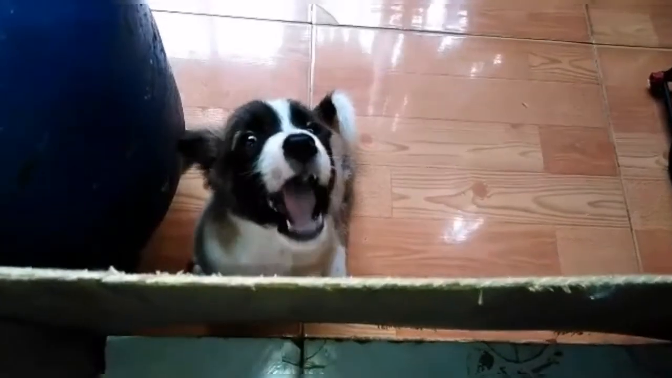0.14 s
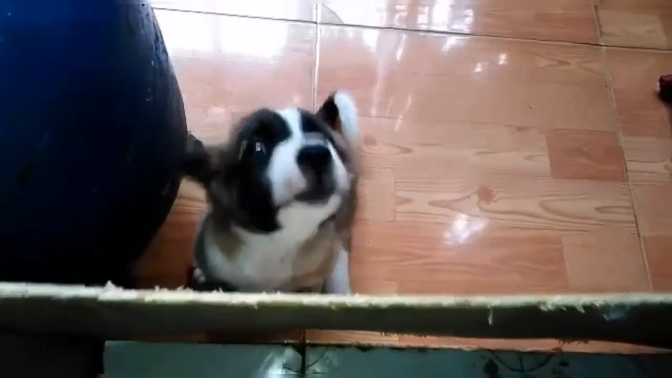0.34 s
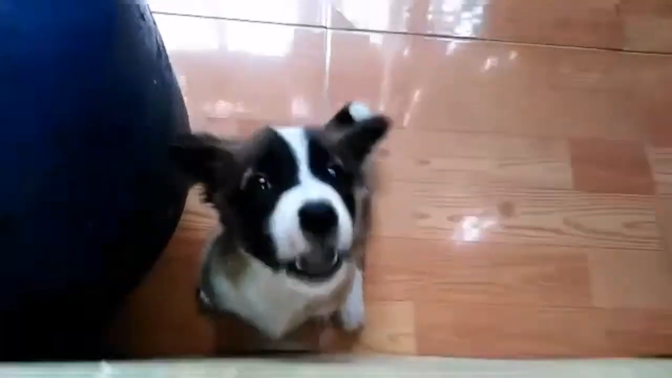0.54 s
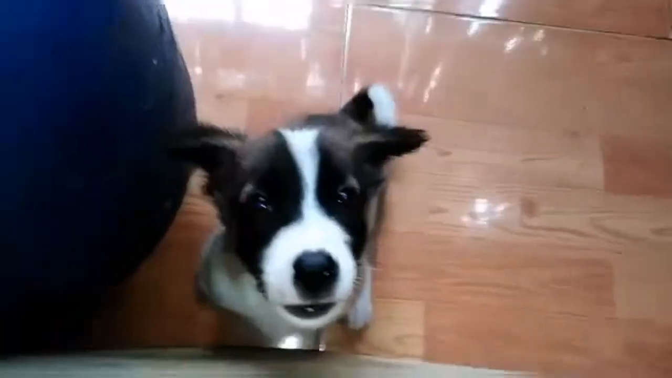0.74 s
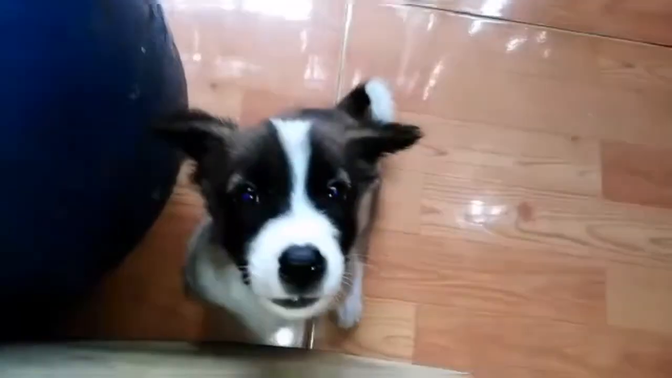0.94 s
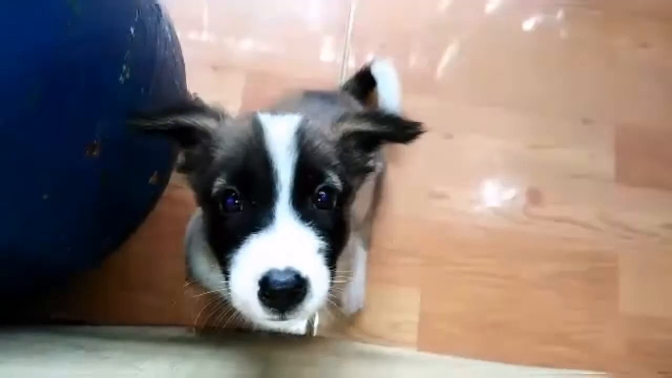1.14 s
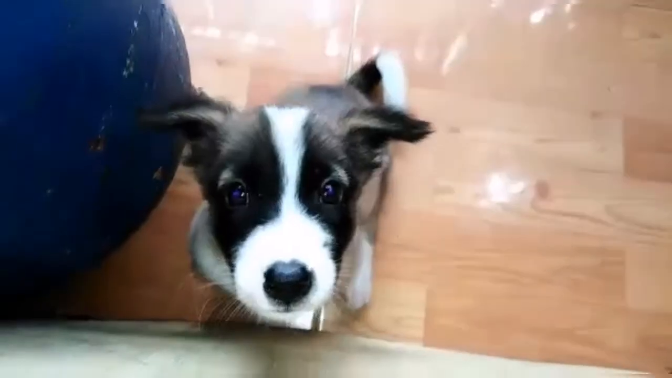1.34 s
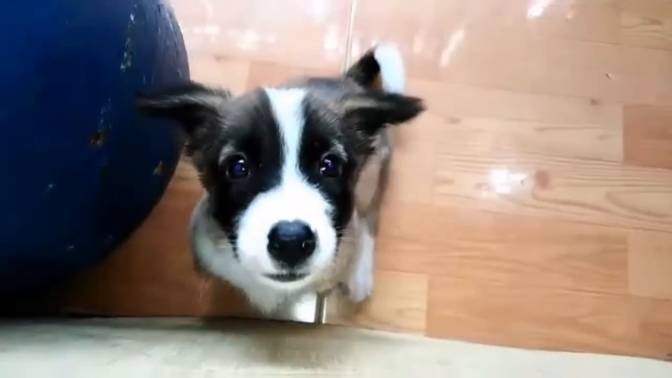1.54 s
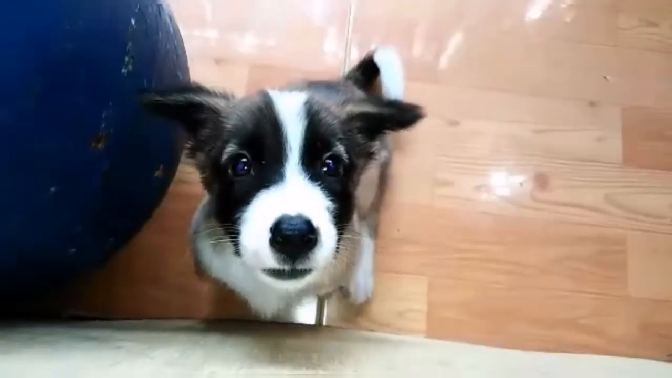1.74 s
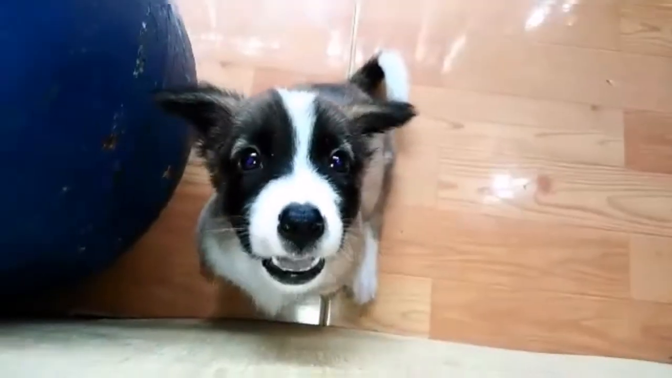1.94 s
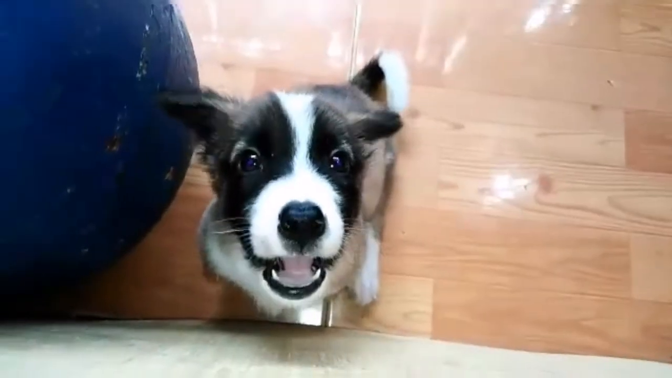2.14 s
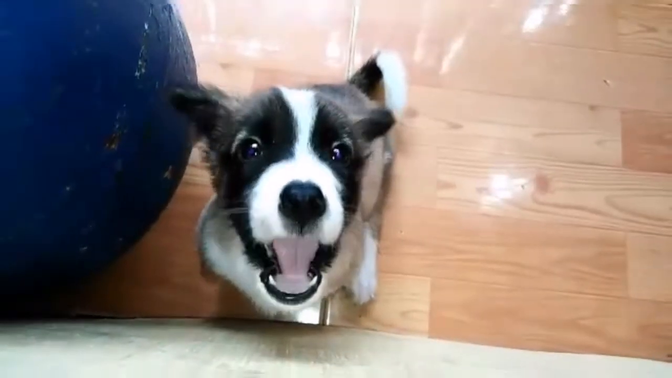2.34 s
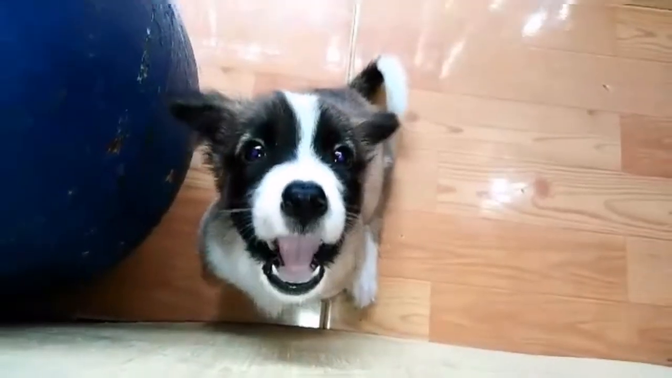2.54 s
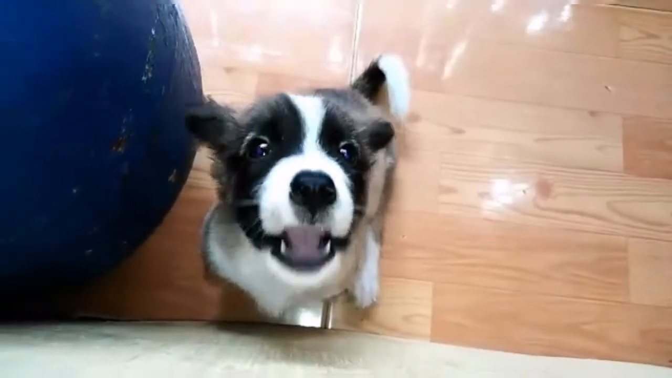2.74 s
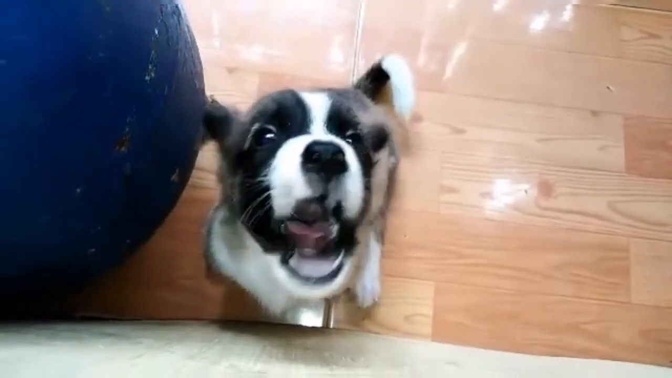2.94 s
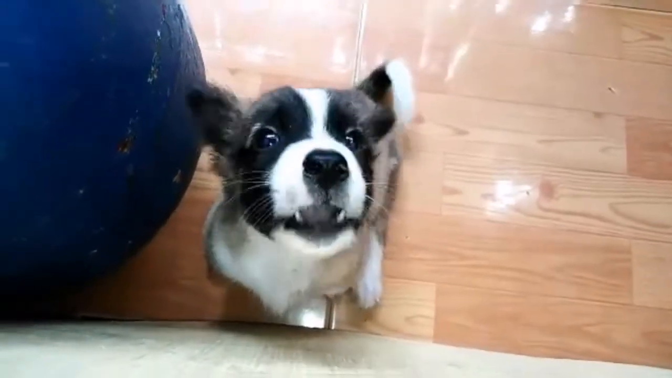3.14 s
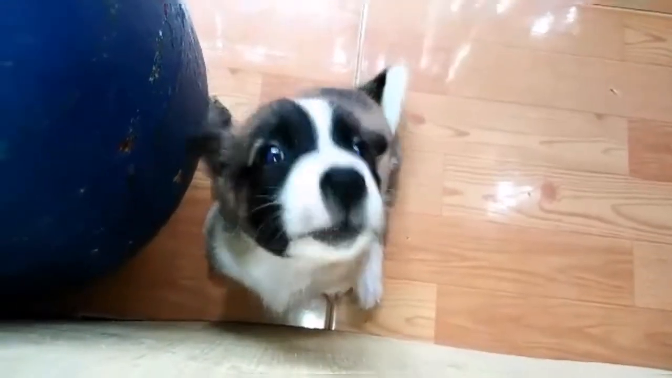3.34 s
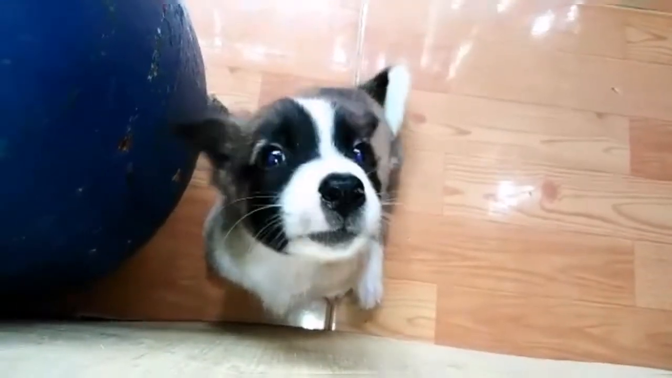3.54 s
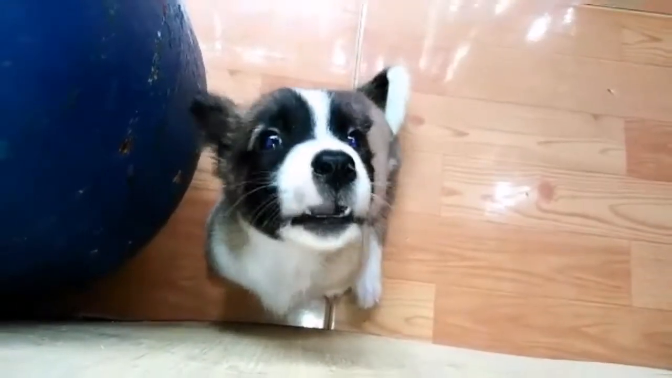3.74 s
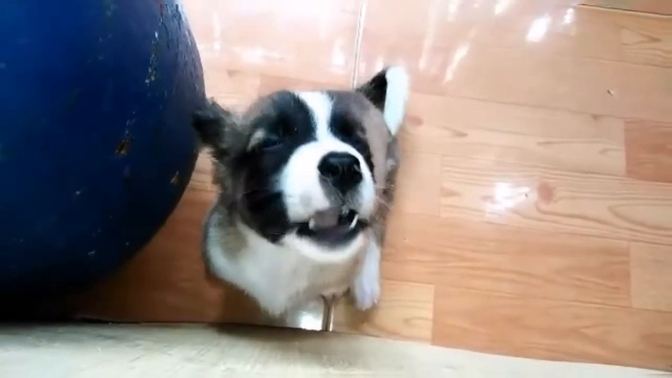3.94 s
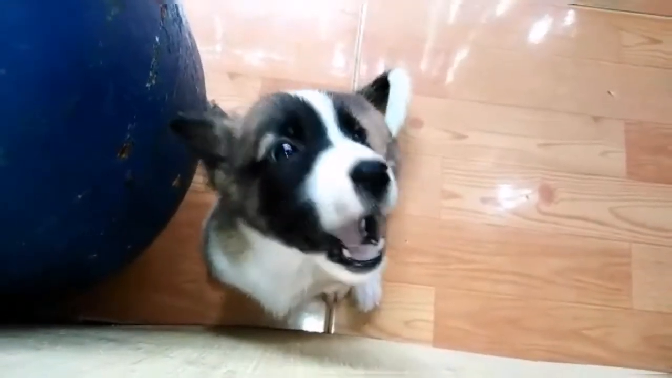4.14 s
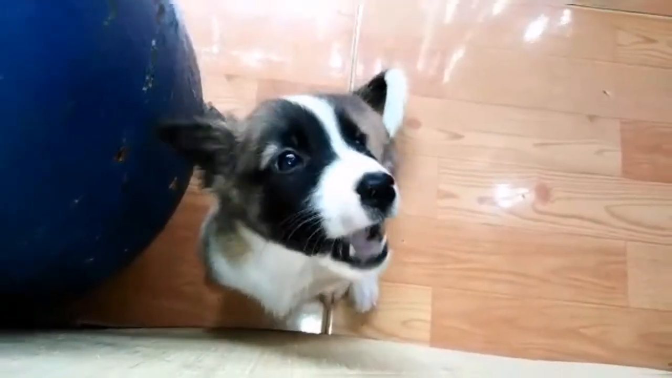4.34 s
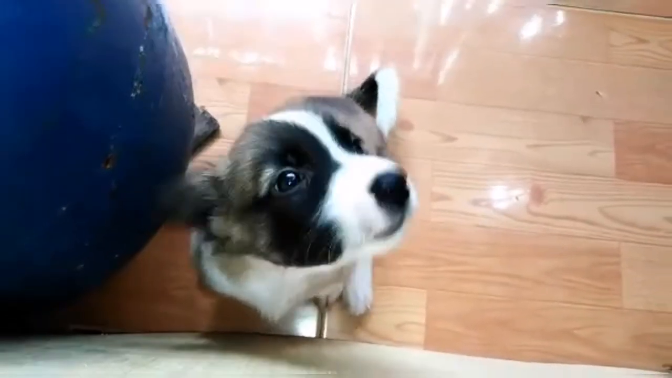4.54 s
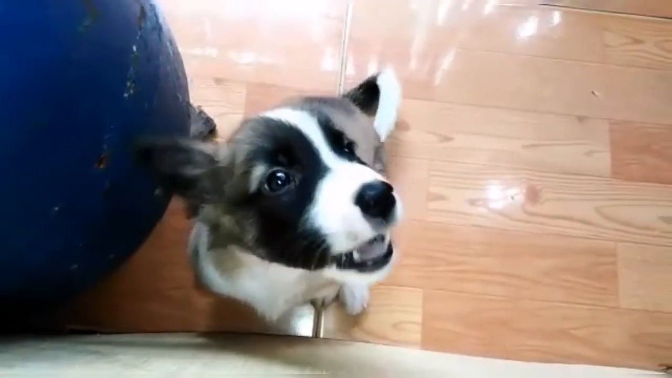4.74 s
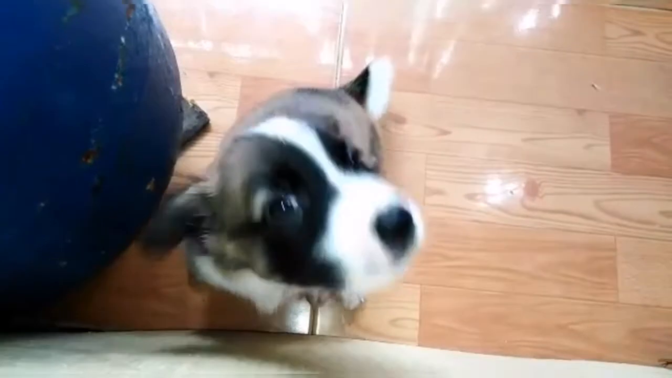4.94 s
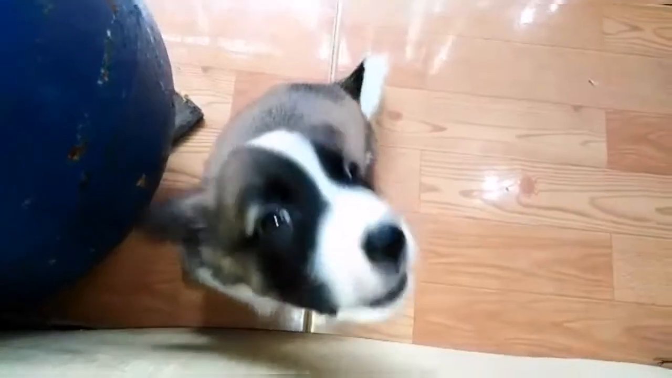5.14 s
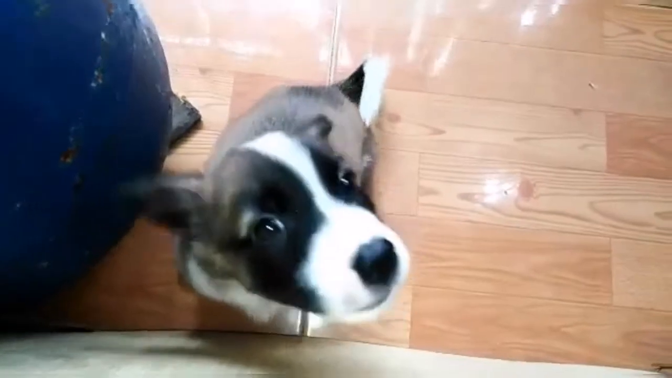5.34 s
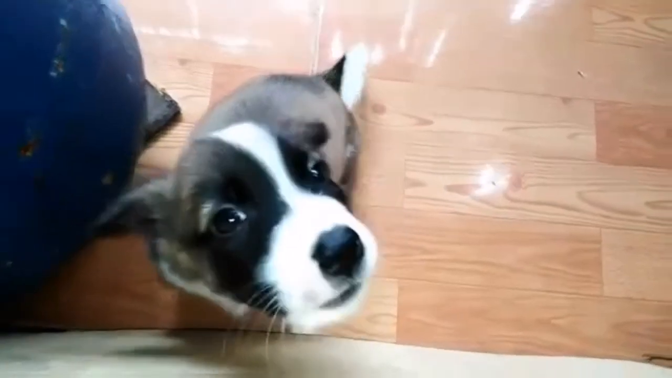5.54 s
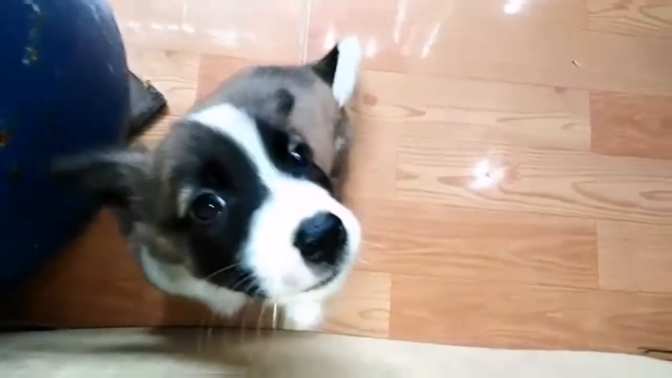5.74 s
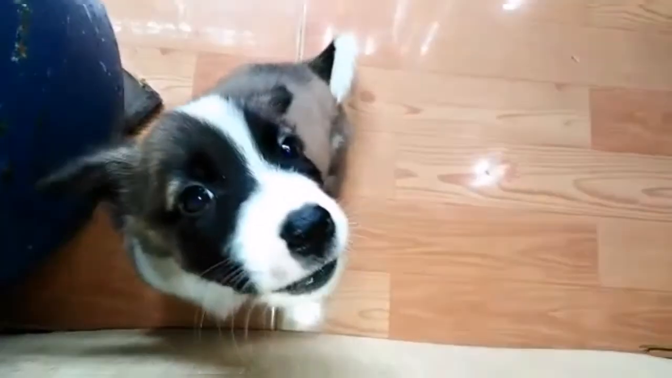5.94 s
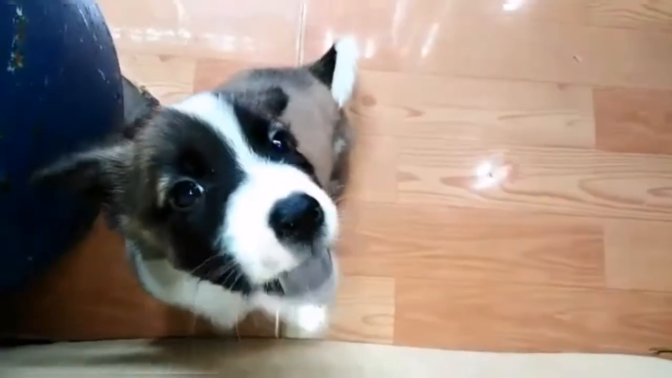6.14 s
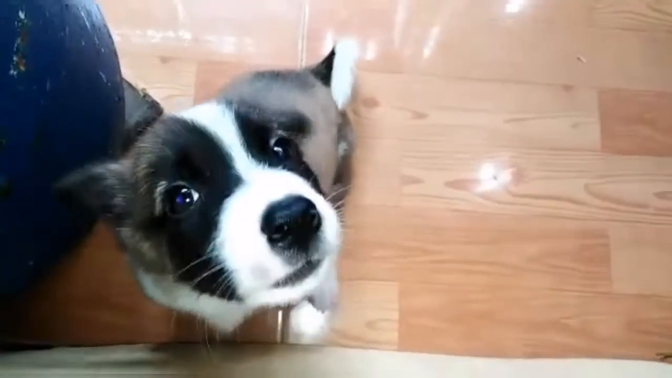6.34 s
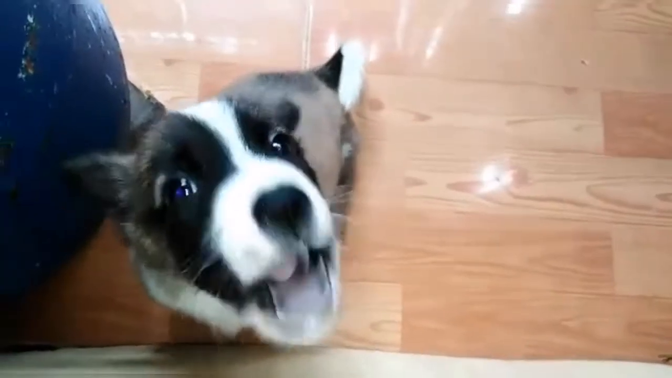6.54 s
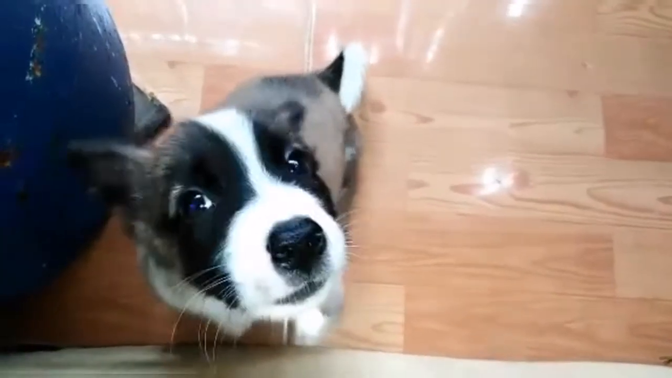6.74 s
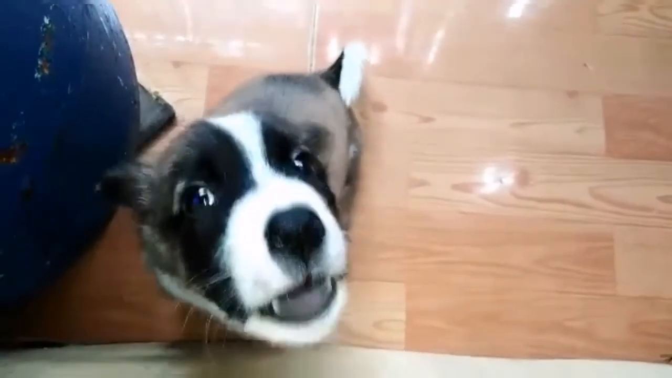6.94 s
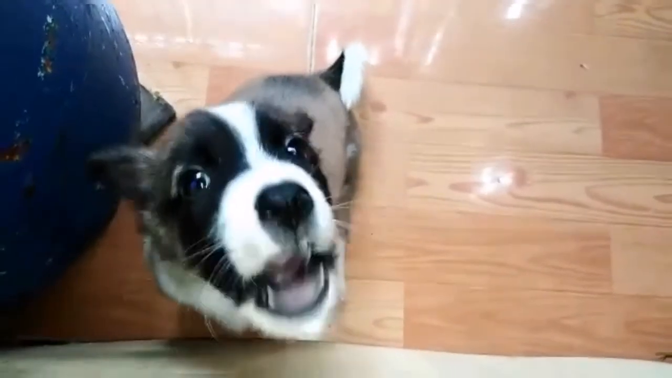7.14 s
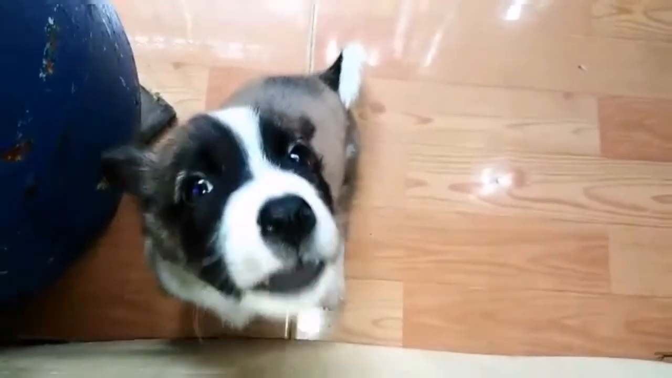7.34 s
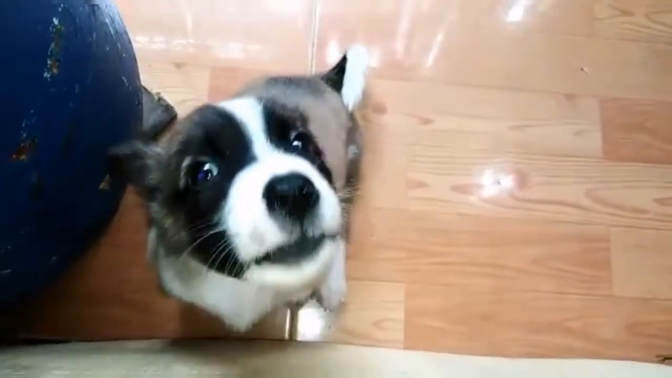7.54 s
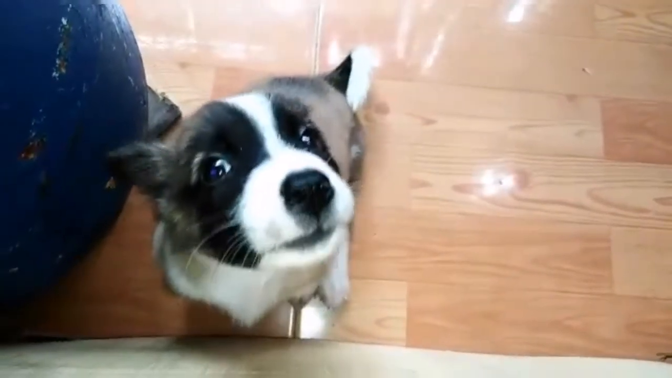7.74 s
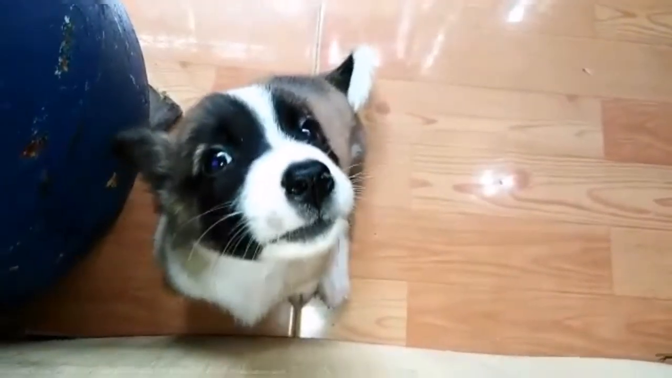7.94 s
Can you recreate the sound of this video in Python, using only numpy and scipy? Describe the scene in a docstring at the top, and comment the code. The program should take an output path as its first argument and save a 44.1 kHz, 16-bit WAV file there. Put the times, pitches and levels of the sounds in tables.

```python
"""A puppy yaps over a faint hum, sitting on a hard floor in a small bare room, a phone held just above it.
Its vocal folds chop the breath into a tone that the throat and mouth shape. Each yap arches in pitch:
hoarse at first, often split by in-between tones at the top, rough again as the mouth closes.
A few thin squeaks join in. In the lull the phone is shifted and something like a board scrapes.
The loudest yaps overload the microphone, and a limiter holds them level."""
import sys
import numpy as np
from scipy import signal
from scipy.fft import rfft, irfft, next_fast_len
from scipy.io import wavfile
from scipy.ndimage import uniform_filter1d, minimum_filter1d

SR = 44100
rng = np.random.default_rng(int(sys.argv[2]) if len(sys.argv) > 2 else 0)


def log_audio(samples):
    """Write samples as a 16-bit WAV file to the path given in sys.argv[1]."""
    # one column per channel
    frames = np.atleast_2d(samples).T
    # limit to full scale, then quantise
    limited = np.clip(frames, -1, 1)
    pcm = np.round(limited * 32767).astype(np.int16)
    wavfile.write(sys.argv[1], SR, pcm)


N = 352789
TIME = np.arange(N) / SR

# A yap is a hard push of air, then a lighter tail in which the pitch falls and the mouth closes.
# (t/s, length/s, attack/s, push/s, fall/s, top pitch/Hz, end pitch/Hz, scoop up/0-1, sag in push/0-1,
#  push level/dB, tail level/dB, end level/dB, in-between tones/gain, push roughness/0-1,
#  tail roughness/0-1, push brightness/dB, tail brightness/dB, mouth resonance/Hz, upper resonance/Hz)
YAP_SHAPES = [ (-.1, .11, .003, .05, 0.1,  770, 572, .3, 0,  -5, -21, -23.5,  0, .4, 0.44,  5, 17,  1730, 3140),
              (0.104, 0.19, 0.00406, .075, 0.099,  965, 623.4, 0.36, 0.08,  -2, -10, -14.5,  0.14, 0.33, 0.13,  5.5, 5,  1660, 3080),
              (0.531, 0.08, 0.0037, 0.047, 0.052,  763.4, 753, 0, 0,  -12, -2, -18.5,  0.5, 0.17, 0.42,  4, 9.5,  1460, 4440),
              (1.733, 0.081, 0.014, 0.053, 0.03,  678.3, 663, .14, 0,  -14.5, -14, -19.5,  0, 0.15, .08,  1, 14,  1750, 4000),
              (1.988, 0.12, 0.0022, 0.042, 0.038,  787.5, 740, 0.29, 0,  -9.5, -12, -24.5,  0, 0.2, 0.01,  3.5, 20,  2040, 3550),
              (2.255, 0.14, 0.0028, 0.061, 0.09,  894, 595, 0.34, 0,  -3.5, 4, -27.5,  0, 0.03, 0,  9, 26,  1900, 3730),
              (2.531, .182, 0.0033, 0.1, 0.05,  1036, 777, 0.5, .3,  0, -28, -14,  0.5, 0.15, 0.21,  10.5, 5.5,  1800, 3530),
              (2.858, .2, 0.0027, 0.1, 0.1,  949, 593, 0.18, 0.02,  -2, -15, -17,  1.35, 0.14, 0.1,  11.5, 4,  1550, 3330),
              (3.229, 0.17, .012, 0.11, 0.081,  945, 594, 0.41, 0.05,  -3.5, -11, -13.5,  0.6, 0.09, 0.42,  4, 3,  1394, 3280),
              (3.609, 0.042, 0.017, 0.028, 0.023,  678.5, 563, 0.16, 0,  -17, -23, -23.5,  0.5, 0.49, 0.59,  -3.5, 1.5,  1510, 4100),
              (3.838, .132, 0.0028, 0.084, .11,  866, 559, 0.36, 0.03,  -8.5, -5, -17,  0, 0.08, 0.34,  6.5, 9,  1600, 3670),
              (4.128, 0.14, 0.0024, 0.06, .11,  872, 562, 0.41, 0,  -7, -2, -17.5,  1.5, 0.05, 0.29,  1.5, 14,  1610, 3460),
              (4.405, 0.19, 0.0034, .062, 0.068,  963, 588, 0.37, .17,  -2, -12, -18.5,  0.16, 0.54, 0.13,  8, 6,  1480, 3270),
              (4.744, 0.18, 0.0034, 0.079, 0.074,  965.4, 587, 0.13, 0.04,  -0.5, -10, -19.5,  1.5, 0.08, 0.21,  3, -2,  1490, 3160),
              (5.076, .18, 0.0067, 0.086, .078,  977, 550, 0.44, 0,  -5, -11, -21.5,  0.9, .14, 0.19,  -1, -3.5,  1314, 3110),
              (5.451, .167, .018, 0.063, 0.067,  961.7, 521, .3, 0.03,  -3.5, -9.5, -18.5,  1.8, 0.29, .28,  2, -4.5,  1290, 3170),
              (5.842, 0.071, 0.016, 0.045, .052,  730, 536, .12, 0,  -18, -20, -25.5,  1.3, 0.1, 0.37,  -19, -8.5,  1450, 3550),
              (6.127, 0.17, .006, 0.058, 0.095,  964, 548, 0.34, 0.01,  -3.5, -4.5, -19,  1.5, 0.31, 0.23,  0, 6,  1353, 3400),
              (6.482, .171, .007, 0.075, 0.073,  969.3, 523.6, 0.4, 0,  -1, -7, -21,  1.8, 0.22, 0.21,  3, -1,  1290, 3380),
              (6.852, .16, .016, 0.0815, 0.082,  940, 546, 0.4, 0.03,  -1, -3, -15,  2.5, 0.17, 0.2,  -0.5, 3.5,  1320, 3410),
              (7.206, 0.17, .02, 0.073, .11,  915, 553, 0.47, 0.05,  -3.5, -1.5, -19,  2, 0.17, 0.29,  1, 3.5,  1340, 3440),
              (7.593, 0.095, .003, .035, 0.068,  770, 542.4, 0.04, 0.04,  -10.5, -11, -13.5,  1.2, 0.19, 0.33,  8.5, 3.5,  1390, 4100),
              (7.908, .091, .003, 0.023, 0.027,  795, 678, 0.18, 0.05,  -10, -12.5, -14,  0.9, 0.42, 0.2,  4.5, 10,  1450, 3400),
              ]
# the fundamental (the tone at the pitch itself) in a clean tail: (pitch/Hz, level over mouth band/dB)
CLEAN_FUNDAMENTAL = [(560, 3), (650, 6), (780, -9), (880, -11.5), (960, 3.5)]
# the throat's resonances, the frequencies it favours: (f/Hz, width/Hz, level/dB)
THROAT_RESONANCES = [(620, 43, -58), (1573, 120, -9.5), (3077, 920, -7), (4360, 545, -8), (5390, 384, -7.5)]
# how long the room's echo takes to fade by 60 dB: (f/Hz, fade/s)
ECHO_FADE = [(200, 0.29), (1400, 0.53), (3200, 0.52), (6000, 0.43), (14000, 0.28)]
# hard things nearby that ring along: (f/Hz, level/dB)
NEARBY_RINGS = [(695, 5.5), (1890, 1), (2270, 9.5), (2900, 4), (3150, 8), (4330, 6), (4576, -2),
                (5975, 11.5), (7070, 6.5)]
# the tones of the hum: (f/Hz, level/dB)
HUM_TONES = [(61, -44.5), (125, -49.5)]
# tone colour of the room's rumble and hiss: (f/Hz, relative level/dB)
ROOM_NOISE_COLOUR = [(30, -24), (55, 3.5), (130, 7.5), (200, -6), (350, -12), (1500, -16.5), (4000, -16.5),
                     (14000, -28.5)]
# rising squeaks; one is a lone whimper, the others break into a yap: (t/s, length/s, start pitch/Hz,
#  end pitch/Hz, start level/dB, end level/dB, fundamental/dB, brightness/dB, mouth resonance/Hz)
SQUEAK_SHAPES = [(.509, 0.016, 892, 1050, -21, -9, -10, -4, 1850),
                 (1.449, 0.059, 1007, 1350, -33, -24.5, 17.5, -6, 1900),
                 (7.574, .019, 917, 1040, -18, -10.5, -5, -14, 1900),
                 (7.894, 0.0097, 837, 1010, -20, -13.5, -9.5, -25, 1800)]
# the phone shifts in the hand, and at 3.585 s the puppy's paw bumps: (t/s, attack/s, hold/s, release/s,
# level/dB)
RUB_STROKES = [(.58, .015, 0.003, 0.023, -26), (.738, .012, 0.027, 0.073, -24),
               (1.2, 0.011, 0.073, 0.12, -33), (1.44, 0.03, 0.067, 0.03, -30.5),
               (3.585, .015, 0.042, .03, -30)]
# tone colour of that rubbing: (f/Hz, relative level/dB)
RUB_COLOUR = [(40, 2), (70, 4.5), (140, 6), (260, -0.5), (340, -14), (445, -3.5), (560, -14), (1200, -25)]
# the board scrapes, slides on and is brushed again: (t/s, attack/s, hold/s, release/s, level/dB)
BOARD_STROKES = [(.655, 0.038, 0.074, 0.027, -15.5), (.8, 0.014, .03, 0.15, -39.5),
                 (1.19, .02, 0.078, 0.13, -43.5)]
# tone colour of that scraping: (f/Hz, relative level/dB)
BOARD_COLOUR = [(180, -44), (300, -16), (407, -5), (1550, -10.5), (2240, -3), (2590, -4.5), (3090, 0),
                (3750, -7), (4400, -2.5), (4840, -12.5), (7130, -4.5), (14000, -22)]

SCOOP_S, RELAX_S = .016, .0087   # how fast the pitch climbs, and the push gives way to the tail
ONSET_DB, ONSET_DULL_DB = -13.5, -9.5   # starting level; dullness of the half-shut mouth
SWELL_SHARE, SETTLE_SHARE = .21, .312   # parts of the push in which pressure builds and hoarseness fades
ONSET_ROUGH, CLOSING_ROUGH = .824, .17   # roughness at the start, and added as the mouth closes
CRACK = .59   # share by which the tail gets rougher halfway down the fall
EASING = .57   # share of their squeeze that the folds give up by the end of the push
FALL_BEND = .85   # the fall follows this share of half a cosine
ONSET_FUNDAMENTAL_DB, PUSH_FUNDAMENTAL_DB = -10, -34   # pressed folds give a weak fundamental
ROUGH_THINS_DB = -39   # loss of fundamental in a fully rough tail


def from_db(db):
    """Turns decibels into a gain to multiply by."""
    return 10 ** (np.asarray(db) / 20)


def rms_one(x):
    """Scales a sound to an average strength (rms) of 1."""
    return x / np.sqrt(np.mean(x ** 2) + 1e-20)


def blend(start, end, share):
    """Moves from start to end as share goes from 0 to 1."""
    return start + (end - start) * share


def at_hz(points, hz):
    """Reads between the rows of a table, giving each octave equal room."""
    table = np.array(points)
    return np.interp(np.log(np.maximum(hz, 1)), np.log(table[:, 0]), table[:, 1])


def noise(shape, size):
    """Noise of strength 1 whose tone colour follows shape(Hz)."""
    padded = next_fast_len(size)
    hz = np.arange(padded // 2 + 1) * SR / padded
    spectrum = rfft(rng.standard_normal(padded)) * shape(hz)
    return rms_one(irfft(spectrum, padded)[:size])


def wander(rate_hz, size):
    """Smooth random motion, typically about 1 either way."""
    return noise(lambda hz: 1 / (1 + (hz / rate_hz) ** 4), size)


def resonances(modes, hz):
    """Gain of several resonances side by side, each a peak around its centre."""
    return np.sqrt(sum(from_db(db) ** 2 / (1 + (2 * (hz - centre) / width) ** 2)
                       for centre, width, db in modes))


def strokes(rows):
    """Gain over time of strokes that each rise, hold and die away."""
    gain = 0
    for s, attack, hold, release, db in rows:
        rise = np.clip((TIME - s) / attack, 0, 1)
        fade = np.exp(-np.maximum(TIME - s - attack - hold, 0) / release)
        gain += from_db(db) * rise * fade
    return gain


def yap(s, length, attack_s, push_s, fall_s, top_hz, end_hz, scoop, sag, push_db, tail_db, end_db,
        between, push_rough, tail_rough, push_bright_db, tail_bright_db, *muzzle):
    """Air pressure builds, holds through the push and relaxes; pitch, level and tone follow it."""
    span, age, gate = airflow(s, length, attack_s)
    built = 1 - np.exp(-(age / (SWELL_SHARE * push_s + attack_s)) ** 2)
    pushing = .5 - .5 * np.tanh((age - push_s) / RELAX_S)
    push_done = np.minimum(age / push_s, 1)
    closing = np.clip(1 + (age - length) / fall_s, 0, 1)
    # the pitch scoops up, is pressed down by a hard push, and falls as the mouth closes
    fallen = (1 - np.cos(np.pi * FALL_BEND * closing)) / (1 - np.cos(np.pi * FALL_BEND))
    pressed = sag * pushing * push_done ** 1.3
    pitch = blend(top_hz, end_hz, fallen) * (1 - scoop * np.exp(-age / SCOOP_S)) * (1 - pressed)
    fading_db = blend(tail_db, end_db, closing)
    level_db = blend(ONSET_DB, blend(fading_db, push_db, pushing), built)
    bright_db = blend(tail_bright_db, push_bright_db, pushing) + ONSET_DULL_DB * (1 - built)
    squeezed = pushing * (1 - EASING * push_done ** 2)
    relaxed_db = at_hz(CLEAN_FUNDAMENTAL, pitch) + ROUGH_THINS_DB * tail_rough
    fundamental_db = blend(ONSET_FUNDAMENTAL_DB, blend(relaxed_db, PUSH_FUNDAMENTAL_DB, squeezed), built)
    # the voice cracks where the pitch drops fastest
    cracked = tail_rough * (1 + CRACK * np.sin(np.pi * closing))
    settled_rough = blend(cracked, push_rough, pushing) + CLOSING_ROUGH * closing
    hoarse_start = np.exp(-(age / (SETTLE_SHARE * push_s)) ** 2)
    rough = blend(settled_rough, ONSET_ROUGH, hoarse_start)
    sound = voice(pitch, fundamental_db, bright_db, between * pushing, rough, muzzle)
    sound += pushing * puff(len(age))
    return span, sound * from_db(level_db) * gate


def airflow(s, length, attack_s=.003, release_s=.008):
    """One breath: the samples it covers, its age at each, and the gain that opens and shuts it."""
    span = np.flatnonzero((TIME > s - attack_s) & (TIME < s + length + 5 * release_s))
    age = TIME[span] - s
    rise = np.clip((age + .00082) / attack_s, 0, 1)
    fade = np.exp(-np.maximum(age - length, 0) / release_s)
    return span, np.maximum(age, 0), rise * fade


def voice(pitch, fundamental_db, bright_db, between, rough, muzzle,
          jitter=.0697, tremor=.0022, rasp=.91, shimmer_db=1.0, stretch=.22,
          flutter_db=4.0, flutter_hz=23.0, fray_share=.51, fray_rest=.12, fray_hz=228.0):
    """The vocal folds and the air they chop sound through the throat."""
    size = len(pitch)
    rough = np.clip(rough, 0, 1)
    bright, fundamental_gain = from_db(bright_db), from_db(fundamental_db)
    # rough folds swing unevenly from cycle to cycle
    hz = pitch * (1 + jitter * rough * wander(227, size) + tremor * wander(73, size))
    phase = 2 * np.pi * np.cumsum(hz) / SR
    fundamental = fundamental_gain * np.sqrt(2) * np.sin(phase)
    # strong and weak cycles in turn add tones halfway between the usual overtones
    multiples = np.arange(1, 33)[:, None] / 2
    weight = np.where(multiples % 1 == 0, 1, between) * (multiples != 1)
    tones = np.sin(multiples * phase + rng.uniform(0, 2 * np.pi, multiples.shape))
    # each tone swells and fades on its own
    tones *= from_db(flutter_db * np.array([wander(flutter_hz, size) for _ in multiples]))
    tones /= np.sqrt(2 * np.mean(tones ** 2))
    # the jaw opens as the pitch climbs and lifts the resonances with it
    opening = (pitch / 880) ** stretch
    bands = [band * weight for band in throat(multiples * pitch / opening, muzzle)]
    mouth, upper = [(band * tones).sum(0) / np.sqrt((band ** 2).sum(0) / 2) for band in bands]
    # the high overtones break up first
    fray = np.clip(fray_share * (rough + fray_rest), 0, 1)
    upper = np.sqrt(1 - fray ** 2) * upper + fray * upper * wander(fray_hz, size)
    # swirling air hisses in bursts, one a cycle
    hiss = noise(lambda f: throat(f, muzzle)[0], size)
    hiss += bright * noise(lambda f: throat(f, muzzle)[1], size)
    hiss *= 1 + .5 * np.cos(phase)
    breathy = np.clip(rasp * rough, 0, 1)
    sound = np.sqrt(1 - breathy ** 2) * (mouth + bright * upper) + breathy * hiss + fundamental
    shimmer = from_db(shimmer_db * rough * wander(69, size))
    return sound / np.sqrt(1 + bright ** 2 + fundamental_gain ** 2) * shimmer


def throat(hz, muzzle, mouth_width_hz=230.0, upper_width_hz=350.0,
           low_hz=330, split_hz=1894, top_hz=5300, leak_db=-5.0):
    """Throat and muzzle shape the voice: gains of the mouth band and of the bright band above it."""
    mouth_hz, upper_hz = muzzle
    peaks = resonances([(mouth_hz, mouth_width_hz, 0), (upper_hz, upper_width_hz, 0)], hz) ** 2
    treble_cut = 1 / np.sqrt(1 + (hz / top_hz) ** 24)
    bass_cut = 1 / np.sqrt(1 + (low_hz / (hz + 1)) ** 8)
    leak = from_db(leak_db) * hz / top_hz
    gain = (peaks + resonances(THROAT_RESONANCES, hz)) * bass_cut * (treble_cut + leak)
    upper_share = 1 / (1 + (split_hz / (hz + 1)) ** 16)
    return gain * np.sqrt(1 - upper_share), gain * np.sqrt(upper_share)


def puff(size, puff_db=-33.0, centre_hz=253.0):
    """The dull rush of air that the push drives out of the mouth."""
    return from_db(puff_db) * noise(lambda hz: resonances([(centre_hz, centre_hz / 2, 0)], hz) ** 2, size)


def room(x, gap_s=.0068, early_s=.032, early_db=-8.0, late_db=-22.0, ring_db=-28.0, ring_fade_s=.42):
    """Floor and near walls answer at once; a wash of echoes and a faint ringing follow."""
    t = TIME[:SR]
    edges_hz = np.geomspace(100, 16000, 9)
    late = 0
    for low, high in zip(edges_hz, edges_hz[1:]):
        band_pass = signal.butter(2, [low, high], "band", fs=SR, output="sos")
        fade = np.exp(-np.log(1000) * t / at_hz(ECHO_FADE, np.sqrt(low * high)))
        late += signal.sosfilt(band_pass, rng.standard_normal(SR)) * fade
    early = rng.standard_normal(SR) * np.exp(-t / early_s)
    ring = sum(from_db(db) * np.sin(2 * np.pi * hz * t) for hz, db in NEARBY_RINGS)
    ring *= np.exp(-np.log(1000) * t / ring_fade_s)
    parts = [(early_db, early), (late_db, late), (ring_db, ring)]
    echo = sum(from_db(db) * rms_one(part * (t > gap_s)) for db, part in parts)
    return x + signal.fftconvolve(x, echo / np.sqrt(SR))[:N]


def background(noise_db=-41, waver_hz=7.5):
    """A wavering hum with low rumble and faint hiss."""
    hum = sum(from_db(db) * np.sqrt(2) * np.sin(2 * np.pi * hz * TIME + wander(waver_hz, N))
              for hz, db in HUM_TONES)
    return hum + from_db(noise_db) * noise(lambda hz: from_db(at_hz(ROOM_NOISE_COLOUR, hz)), N)


def squeak(s, length, start_hz, end_hz, start_db, end_db, fundamental_db, bright_db, mouth_hz,
           upper_hz=4100, rough=.19):
    """Tight vocal folds give a fairly clean tone that glides upward."""
    span, age, gate = airflow(s, length)
    risen = np.minimum(age / length, 1)
    pitch = blend(start_hz, end_hz, risen)
    sound = voice(pitch, fundamental_db, bright_db, between=0, rough=rough, muzzle=(mouth_hz, upper_hz))
    return span, sound * from_db(blend(start_db, end_db, risen)) * gate


def hand_rub():
    """The hand's dull rubbing is carried through the phone's case; once the puppy's paw bumps."""
    return strokes(RUB_STROKES) * noise(lambda hz: from_db(at_hz(RUB_COLOUR, hz)), N)


def board_scrape(grain_db=1.5, ring_db=-4.0, ring_width_hz=8.6):
    """Fibres catch and slip unevenly and set the hard things nearby ringing."""
    colour = lambda hz: from_db(at_hz(BOARD_COLOUR, hz))
    modes = [(hz, ring_width_hz, db) for hz, db in NEARBY_RINGS]
    friction = noise(colour, N) * from_db(grain_db * wander(150, N))
    ringing = noise(lambda hz: colour(hz) * resonances(modes, hz), N)
    return strokes(BOARD_STROKES) * rms_one(friction + from_db(ring_db) * ringing)


def scene():
    """Puppy and board echo in the room; one microphone hears it all, the same in both channels."""
    puppy = np.zeros(N)
    for span, sound in [yap(*row) for row in YAP_SHAPES] + [squeak(*row) for row in SQUEAK_SHAPES]:
        puppy[span] += sound
    mix = room(puppy + board_scrape()) + hand_rub() + background()
    return np.tile(mix, (2, 1))


def limiter(x, ceiling_db=-10.5, release_db_per_s=216.0, smooth_samples=45):
    """Turns the volume down at once on a peak, then steadily back up."""
    level_db = 20 * np.log10(np.abs(x).max(axis=0) + 1e-9)
    over_db = np.maximum(level_db - ceiling_db, 0)
    recovery_db = release_db_per_s * TIME
    cut_db = np.maximum.accumulate(over_db + recovery_db) - recovery_db
    gain_db = uniform_filter1d(minimum_filter1d(-cut_db, smooth_samples), smooth_samples)
    return x * from_db(gain_db)


def record(dry, overload_db=-3.0, low_cut_hz=46.0, high_cut_hz=14100):
    """The microphone overloads, the limiter levels the yaps, the deepest bass and top treble are cut."""
    clipped = dry / (1 + (dry / from_db(overload_db)) ** 8) ** (1 / 8)
    bass_cut = signal.butter(3, low_cut_hz, "high", fs=SR, output="sos")
    treble_cut = signal.ellip(12, .2, 90, high_cut_hz, fs=SR, output="sos")
    return signal.sosfilt(treble_cut, signal.sosfilt(bass_cut, limiter(clipped)))


dry = scene()
out = record(dry)
log_audio(out)
```